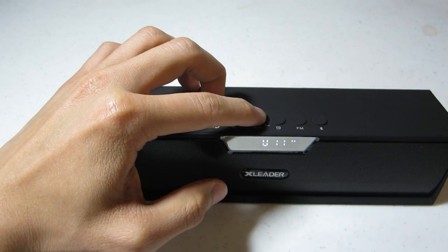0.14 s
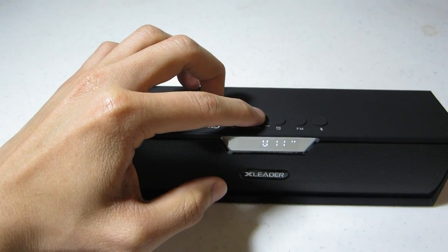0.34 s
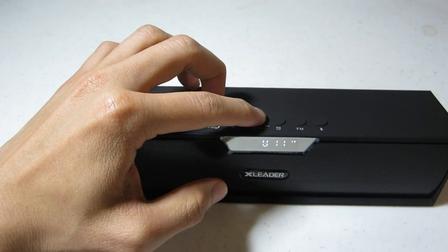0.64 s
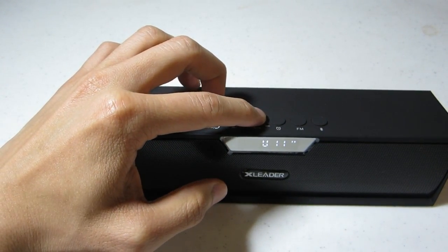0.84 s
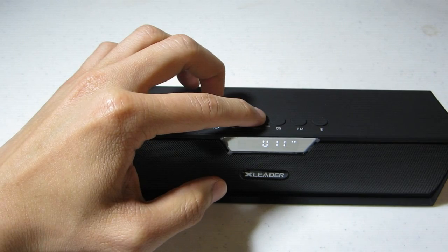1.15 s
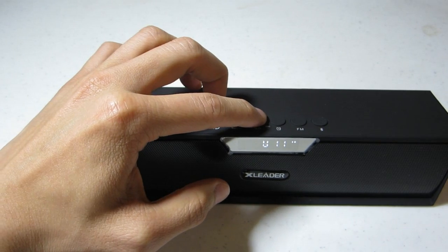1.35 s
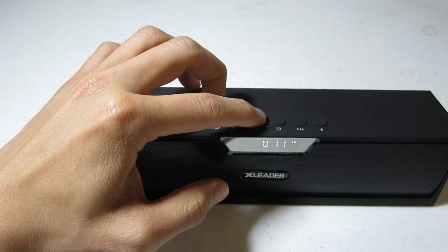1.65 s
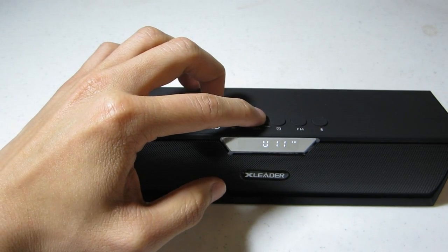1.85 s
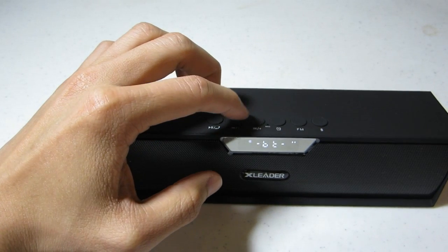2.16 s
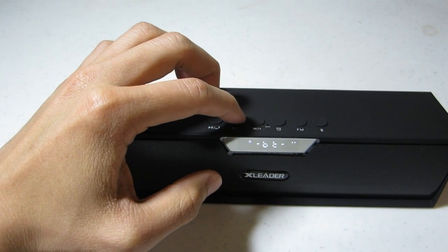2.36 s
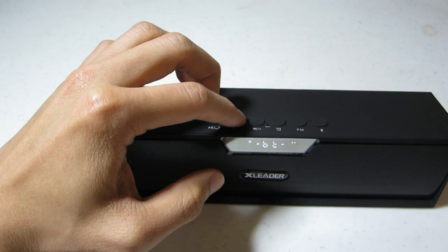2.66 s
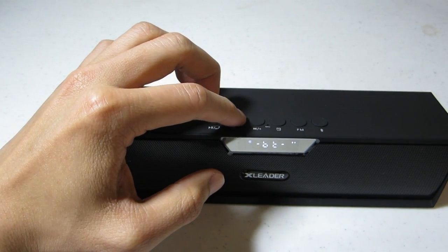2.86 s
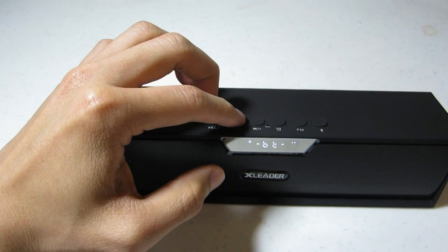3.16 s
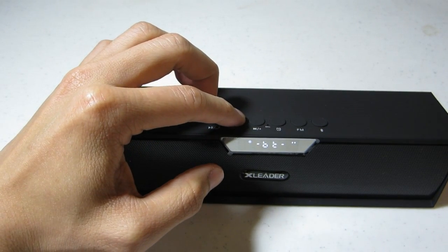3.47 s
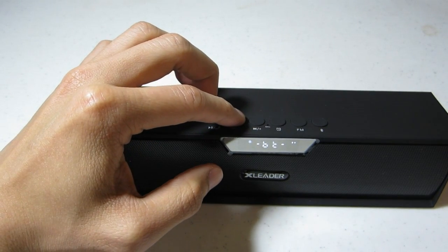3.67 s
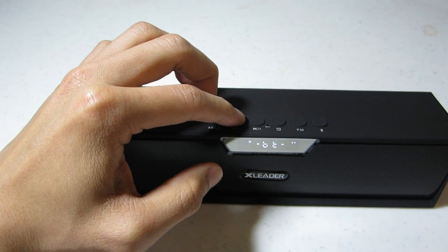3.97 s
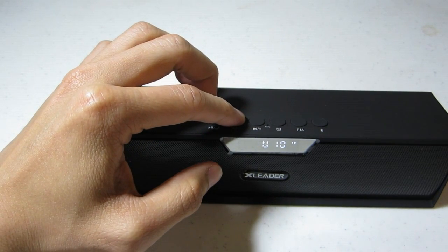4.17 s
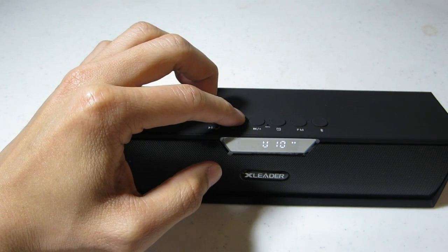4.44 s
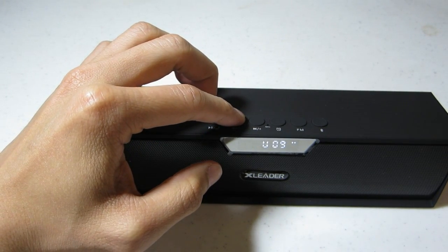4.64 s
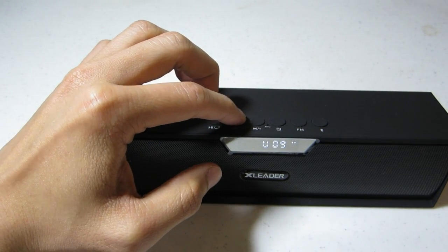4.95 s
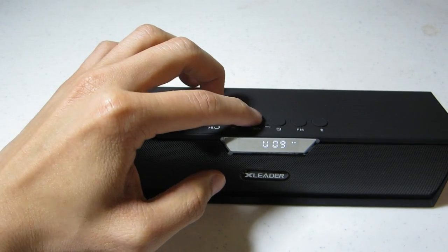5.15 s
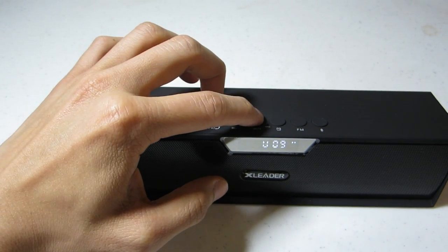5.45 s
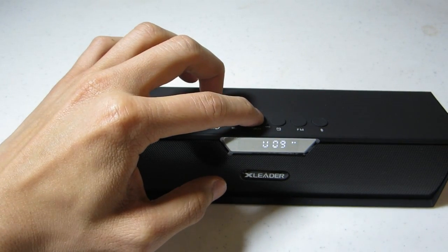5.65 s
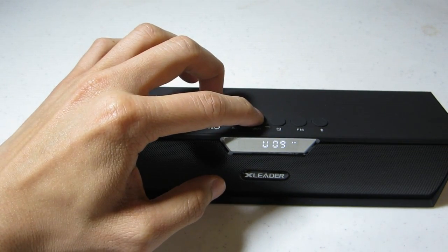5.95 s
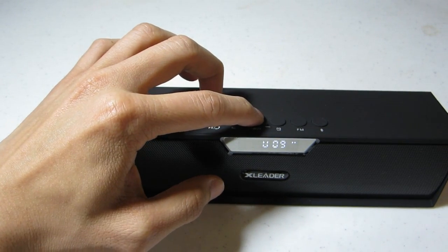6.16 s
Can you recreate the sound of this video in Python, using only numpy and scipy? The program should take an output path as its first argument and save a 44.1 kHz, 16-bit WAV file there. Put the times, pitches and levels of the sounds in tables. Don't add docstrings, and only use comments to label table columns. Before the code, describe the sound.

Two small buttons on a hollow plastic case are clicked by a finger, close to the microphone in a small quiet room. Three firm presses with bright releases come first, then softer presses and snappy releases of the other button, a pause, and two last clicks. A very faint skin tick ends it over hiss and low rumble.

```python
import sys
import numpy as np
from scipy import signal
from scipy.io import wavfile

SR = 44100
rng = np.random.default_rng(int(sys.argv[2]) if len(sys.argv) > 2 else 0)


def decibels_to_gain(level_db):
    exponent = np.asarray(level_db, float) / 20
    return 10 ** exponent


def transcribe(signal):
    frames = np.atleast_2d(signal).T
    limited = np.clip(frames, -1, 1)
    pcm = np.round(limited * 32767).astype(np.int16)
    wavfile.write(sys.argv[1], SR, pcm)


N = 278266

# frequency in Hz, t60 in seconds, then level
# in dB when struck by # right push, right release, left push, left release.
CASE_MODES = [(713, 0.063, -19.5, -33.5, -9.5, -27), (883, 0.0064, -3.5, -15, 6, -11),
              (990, 0.08, -11, -23, -2, -16.5), (1273.4, 0.032, 4.5, -5.5, 1.8, -8.5),
              (1336, 0.012, 9, 0, 6, -4.5), (1572, 0.036, 0.8, -6.5, -2, -15.5),
              (1663, 0.0071, -0.7, -8, 3, -12), (2084, .0215, -7.5, -15.5, -5, -13),
              (2366, 0.02, -6, -14.5, -13.5, -10.5), (2706, 0.024, -7, -14.5, -18, -9),
              (2950, 0.014, -12.5, -14, -19.5, -10), (3547, 0.0072, -17.5, -2, -5.5, -1.5),
              (3900, 0.01, -8.5, 3.5, -10, 2.9), (4093, 0.0071, -3.5, 0.7, -8, 0.5),
              (4597, 0.011, -6.5, -9.5, -16.5, -3.5), (5513, 0.0086, -13.5, -12.5, -19, -4),
             (6084, 0.0084, -8.5, -6.5, -21, -6.5), (6520, 0.0057, -13, -4, -25, 0),
             (7180, 0.0079, -14, -11, -26, -11), (7680, 0.0066, -5, -10.5, -25, -8.5),
             (8280, 0.0071, -8, -8.0, -27.5, -16), (8860, 0.0044, -16, -8, -17.5, -8),
             (9633, 0.0054, 5.0, 0, -5, 8.5), (9692, 0.0059, 5.5, 1.0, -5, 7.0),
             (11430, 0.0058, -15, -17, -17.5, -9), (12330, 0.0051, -16, -21.5, -17.5, -18),
             (14053, 0.0036, -20.0, -26.5, -20, -16.5)]
# start in seconds, peak level in dB, brightness in dB per octave.
RIGHT_PUSH = [
    (0.2888, -11.5, 0.9),
    (1.1693, -10.5, -0.45),
    (1.9011, -11.5, 0.5),
]
RIGHT_RELEASE = [
    (0.4926, -4.5, -0.66),
    (1.3052, -4.5, -0.4),
    (5.1225, -32, -4),
    (5.1250, -32, -6),
    (5.234, -5.5, 0.56),
]
LEFT_PUSH = [
    (2.9199, -21, 0.046),
    (4.9865, -18.5, 0.05),
]
LEFT_RELEASE = [
    (2.709, -8, 0.05),
    (3.0902, -8.5, 0.05),
]
# crossover in Hz (first contact dull, second bright),
# delay of the second in seconds, its level in dB.
CONTACTS = [
    (2980, 0.00057, -6),
    (5240, 0.0004, 0.6),
    (2750, 0.000784, 9),
    (6150, 0.00067, -11),
]
# delay in seconds, level in dB.
TABLE_ECHO = [(.0034, -11)]
# start in seconds, peak level in dB.
SKIN_SLIPS = [(6.1995, -40), (6.2028, -41), (6.2093, -44), (6.2130, -51), (6.2150, -49), (6.2180, -46),
              (6.2215, -35), (6.223, -33)]
# frequency in Hz, level in dB, t60 in seconds.
SLIP_RINGS = [(5300, 0.5, 0.0028), (6750, -1, 0.003), (8070, -3, 0.0058), (9700, -1.5, 0.0023),
              (11900, 0, .0015)]
# start in seconds, peak level in dB, pitch in Hz.
HAND_BUMPS = [
    (5.126, -42, 81),
    (5.167, -48, 80.3),
    (6.188, -49.5, 109),
    (6.221, -48.5, 185),
]
# frequency in Hz, t60 in seconds, level in dB.
ROOM_DECAY = [(600, 0.16, -7), (990, 0.27, -62), (1430, 0.36, -24), (2460, .25, -25.5), (5400, 0.27, -24.5),
              (9000, 0.17, -23.5), (14200, 0.27, -37)]
# frequency in Hz, ring t60 in seconds, fade t60 in seconds, level in dB.
AIR_RESONANCES = [(1316, 0.059, 0.43, -79), (1550, 0.045, 0.21, -89), (2615, 0.025, .27, -72.5),
                  (1050, 0.028, .22, -74.5)]
# frequency in Hz, density in dB per Hz.
BACKGROUND_SPECTRUM = [(12, -34), (20, -16), (43, 2), (70, -3.5), (96, 0), (154, -9), (422, -13.5),
                       (499, -14), (590, -15), (1220, -19.5), (1910, -22.5), (5850, -28), (7950, -29),
                 (13500, -35.5), (16000, -40.5)]
# time in seconds, level in dB.
RUMBLE_SWELL = [(0.0, -63), (0.35, -61), (2.71, -62), (2.9, -59), (3.32, -64), (4.67, -60), (5.03, -58.5),
                (5.41, -61.5), (6.31, -57)]
# frequency in Hz, peak level in dB before a common 1.5 dB cut.
WHINES = [(7854, -80), (7881, -78), (8000, -92), (13049, -106)]


def at_hz(points, hz, column):
    points = np.array(points)
    return np.interp(np.log(hz), np.log(points[:, 0]), points[:, column])


def clicks_at(seconds, sizes):
    train = np.zeros(N)
    np.add.at(train, np.round(np.asarray(seconds) * SR).astype(int), sizes)
    return train


def ring(clicks, hz, t60):
    radius = decibels_to_gain(-60 / (t60 * SR))
    angle = 2 * np.pi * hz / SR
    return signal.lfilter([0, np.sin(angle)], [1, -2 * radius * np.cos(angle), radius ** 2], clicks + 1e-18)


def butter(x, order, hz, kind):
    return signal.sosfilt(signal.butter(order, hz, kind, fs=SR, output="sos"), x)


def bands(size):
    edges = 18 * 2 ** np.arange(0, 10.1, 1 / 3)
    white = rng.standard_normal((2, size + SR // 4))
    for k, (low, high) in enumerate(zip(edges, edges[1:])):
        yield np.sqrt(low * high), butter(white[k % 2], 2, [low, high], "band")[-size:]


def switches():
    direct, around = np.zeros((2, N))
    modes = CASE_MODES
    kinds = [np.array(rows) for rows in (RIGHT_PUSH, RIGHT_RELEASE, LEFT_PUSH, LEFT_RELEASE)]
    scatter_db = [0.15 * rng.standard_normal((len(snaps), len(modes))) for snaps in kinds]
    for m, (hz, t60, *mode_db) in enumerate(modes):
        contacts, merged = np.zeros((2, N))
        for snaps, level_db, chance_db, (cross_hz, lag, second_db) in zip(kinds, mode_db, scatter_db, CONTACTS):
            start, peak_db, tilt_db = snaps.T
            size = decibels_to_gain(peak_db + level_db - 3.5 + tilt_db * np.log2(hz / 2000) + chance_db[:, m])
            first = min(1, cross_hz / hz)
            second = decibels_to_gain(second_db) * min(1, hz / cross_hz) ** 2
            contacts += clicks_at(start, size * first)
            contacts += clicks_at(start + lag, size * second)
            merged += clicks_at(start, size * np.hypot(first, second))
        sign = (-1) ** m
        blur = 0.57 if hz < 1900 else 0.3
        direct += sign * ring(contacts, hz, t60)
        around += sign * ring(merged, hz, t60 * blur)
    delays, echo_db = np.transpose(TABLE_ECHO)
    echo = clicks_at(delays, decibels_to_gain(echo_db))[:400]
    reflected = signal.lfilter(echo, 1, butter(direct, 1, 5000, "low"))
    return butter(direct, 2, 500, "high") + reflected, around


def peel():
    start, peak_db = np.transpose(SKIN_SLIPS)
    chance_db = 6 * rng.standard_normal((len(SKIN_SLIPS), len(SLIP_RINGS)))
    out = np.zeros(N)
    for k, (hz, ring_db, t60) in enumerate(SLIP_RINGS):
        slips = clicks_at(start, decibels_to_gain(peak_db + ring_db - 4.5 + chance_db[:, k]))
        out += ring(slips, hz, t60) * (-1) ** k
    return butter(out, 2, 3500, "high")


def thuds():
    lead_s = 0.0047
    table_hz, spread, t60 = 108, 0.18, 0.057
    pushes = [(s, -43.5) for s, *_ in RIGHT_PUSH + LEFT_PUSH]
    releases = [(s, -48.5) for s, *_ in RIGHT_RELEASE + LEFT_RELEASE]
    thumps = [(s - lead_s, db, table_hz * np.exp(spread * rng.standard_normal())) for s, db in pushes + releases]
    out = np.zeros(N)
    for s, db, hz in thumps + HAND_BUMPS:
        swell = ring(ring(clicks_at([s], 1), hz, t60), hz, t60)
        out += decibels_to_gain(db) * swell / np.abs(swell).max()
    return out


def room(x):
    t = np.arange(SR // 2) / SR
    tail = np.zeros(len(t))
    for hz, noise in bands(len(t)):
        tail += noise * decibels_to_gain(at_hz(ROOM_DECAY, hz, column=2) - 60 * t / at_hz(ROOM_DECAY, hz, column=1))
    tail *= decibels_to_gain(-10.5)
    for hz, ring_s, fade_s, db in AIR_RESONANCES:
        tail += ring(rng.standard_normal(len(t)), hz, ring_s) * decibels_to_gain(db - 60 * t / fade_s)
    near_db, near_t60_s = -21, 0.036
    near = rng.standard_normal(len(t)) * decibels_to_gain(near_db - 60 * t / near_t60_s) * np.clip(t / 0.003, 0, 1)
    near = butter(near, 2, [2200, 13000], "band")
    onset = np.clip((t - 0.006) / 0.0022, 0, 1)
    echoes = signal.fftconvolve(x, tail * onset + near)[:N]
    return butter(echoes, 4, [700, 14500], "band")


def background():
    t, out = np.arange(N) / SR, np.zeros(N)
    times, swell_db = np.transpose(RUMBLE_SWELL)
    swell_db = np.interp(t, times, swell_db - swell_db.mean())
    lumps_per_s, lump_depth_db = 6.5, 2.0
    lumps = rng.standard_normal(200)
    lump_db = lump_depth_db * np.interp(t * lumps_per_s, np.arange(len(lumps)), lumps)
    for hz, noise in bands(N):
        level_db = at_hz(BACKGROUND_SPECTRUM, hz, column=1)
        if hz < 200:
            level_db = level_db + swell_db + lump_db
        elif hz < 900:
            level_db = level_db + 0.27 * swell_db
        out += noise * decibels_to_gain(level_db)
    out = signal.sosfilt(signal.cheby2(12, 40, 16050, fs=SR, output="sos"), out)
    whines = sum(decibels_to_gain(db - 1.5) * np.sin(2 * np.pi * (hz * t + rng.random())) for hz, db in WHINES)
    return decibels_to_gain(-56.5) * out / np.std(out) + whines


def scene():
    case, around = switches()
    skin = peel()
    return (case + skin + room(around + 0.53 * skin) + thuds() + background())[None]


def band_limit(x):
    return signal.sosfilt(signal.butter(12, 16790, fs=SR, output="sos"), x)


def record(dry):
    mix = signal.sosfilt(signal.cheby2(12, 40, 16700, fs=SR, output="sos"), dry)
    return band_limit(mix)


dry = scene()
out = record(dry)
transcribe(out)
```